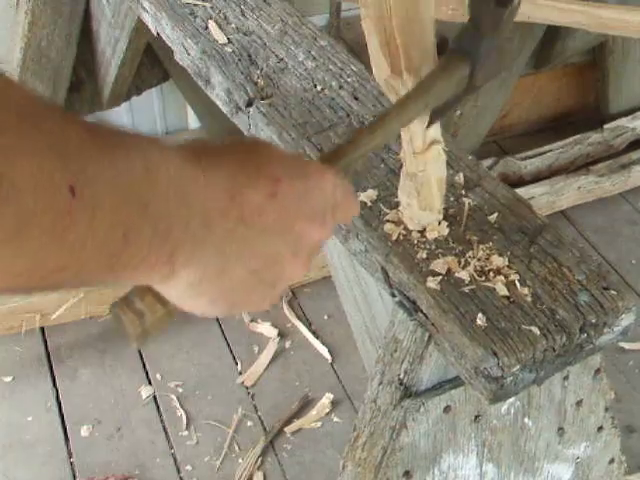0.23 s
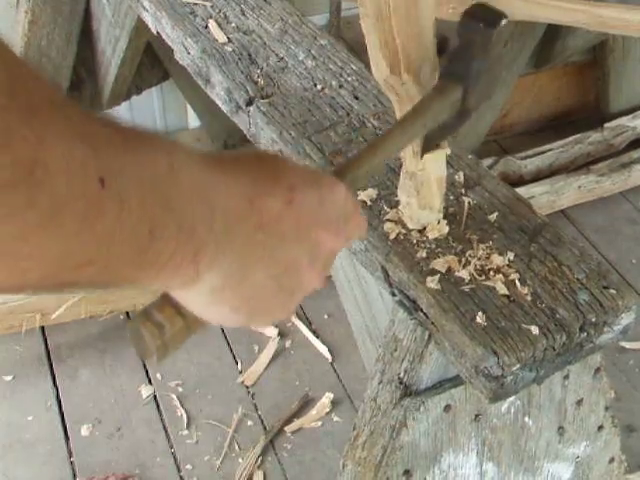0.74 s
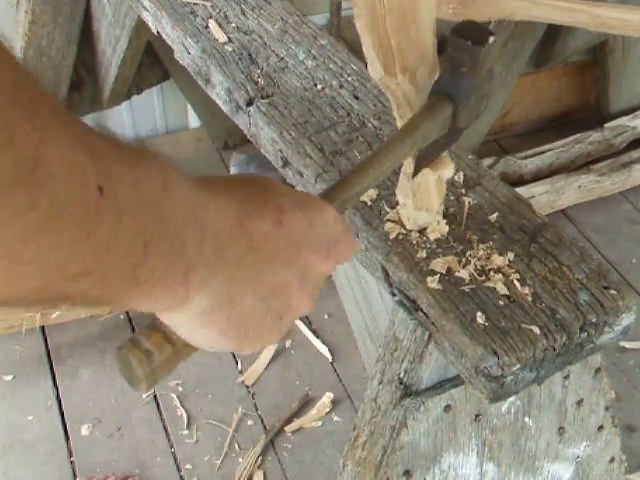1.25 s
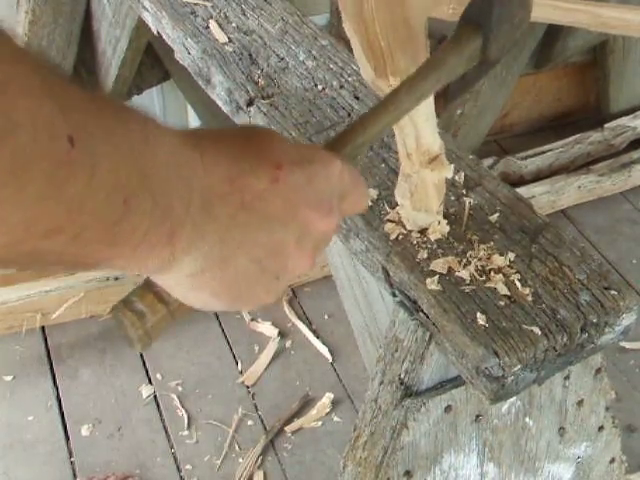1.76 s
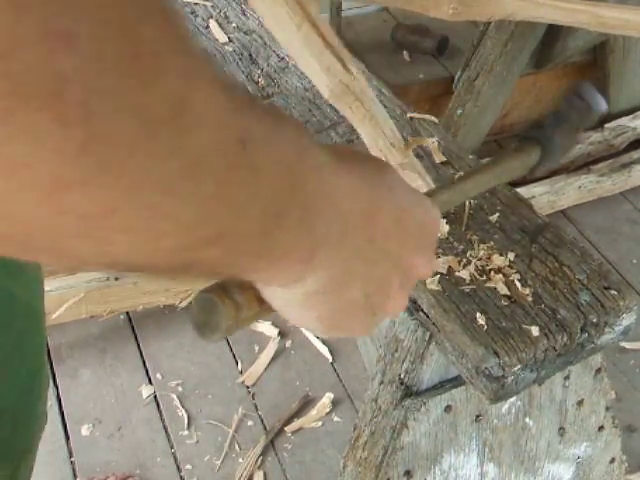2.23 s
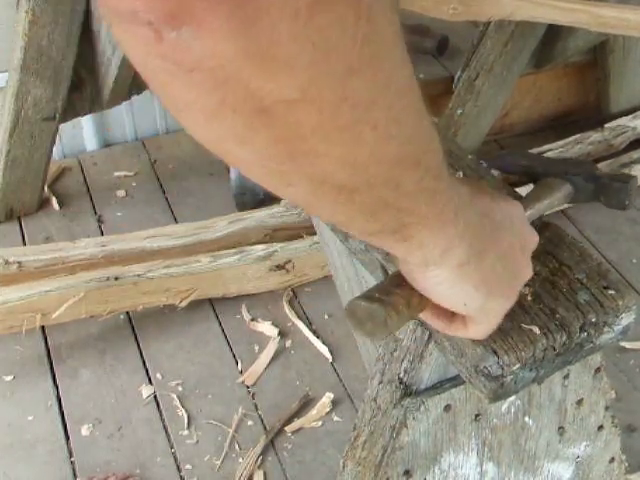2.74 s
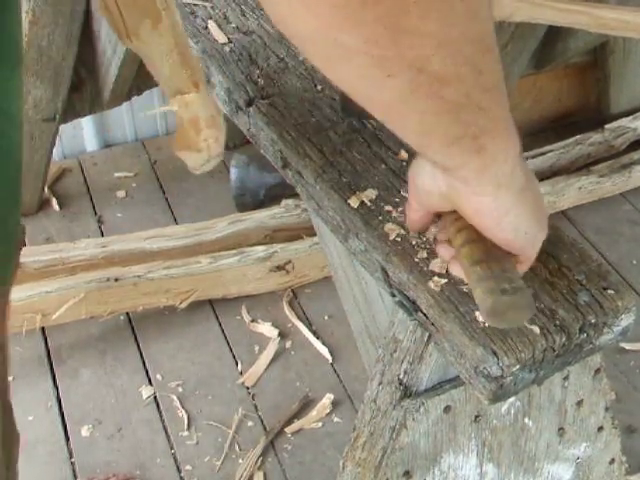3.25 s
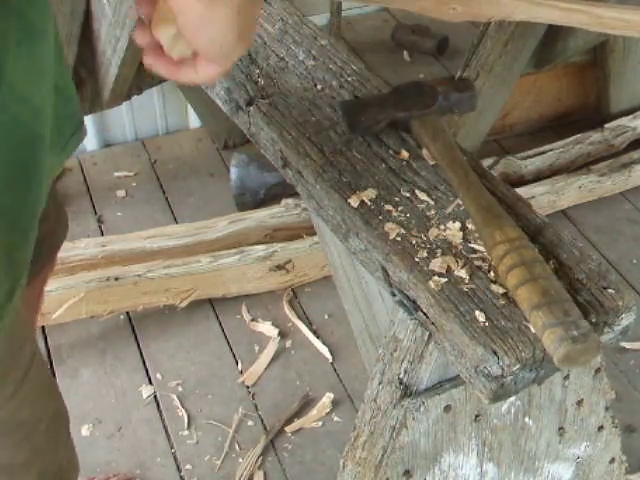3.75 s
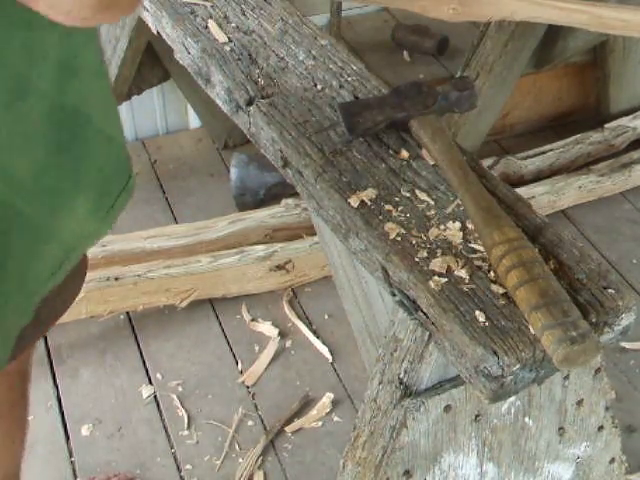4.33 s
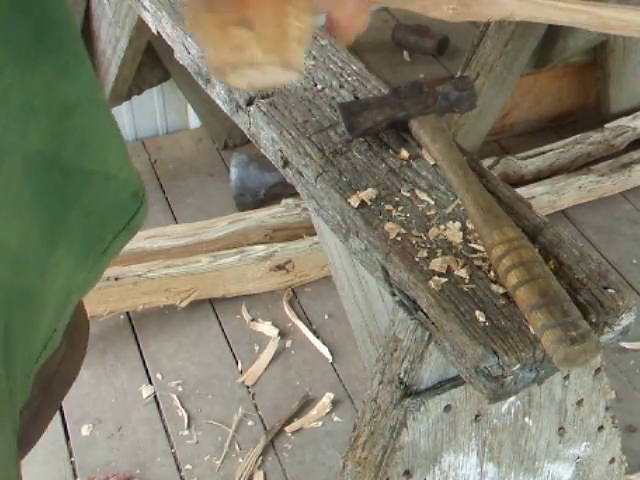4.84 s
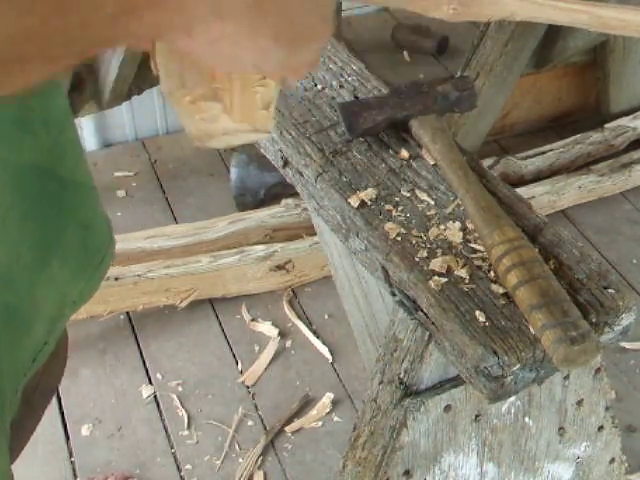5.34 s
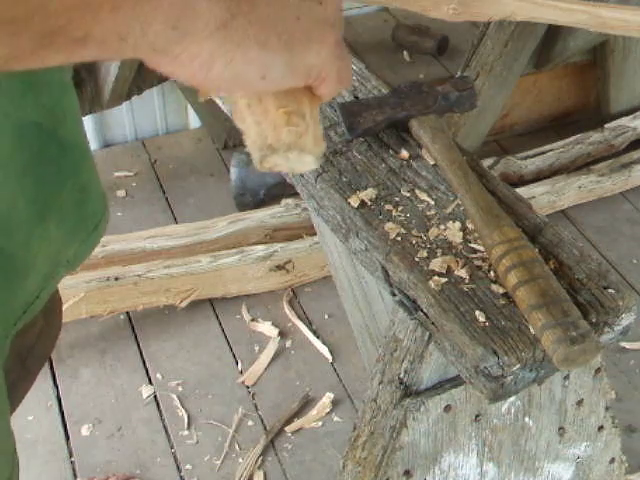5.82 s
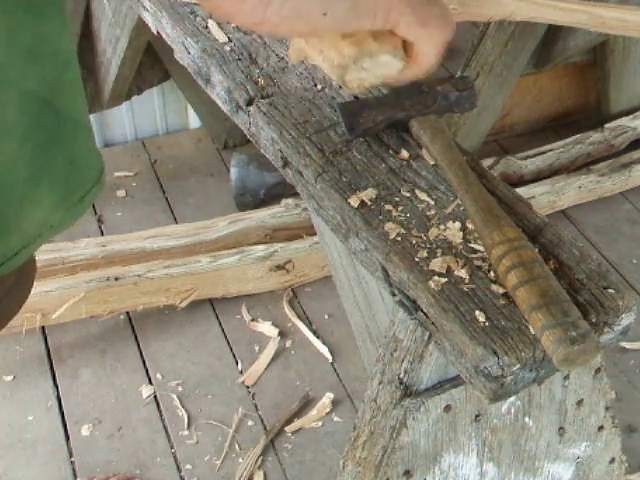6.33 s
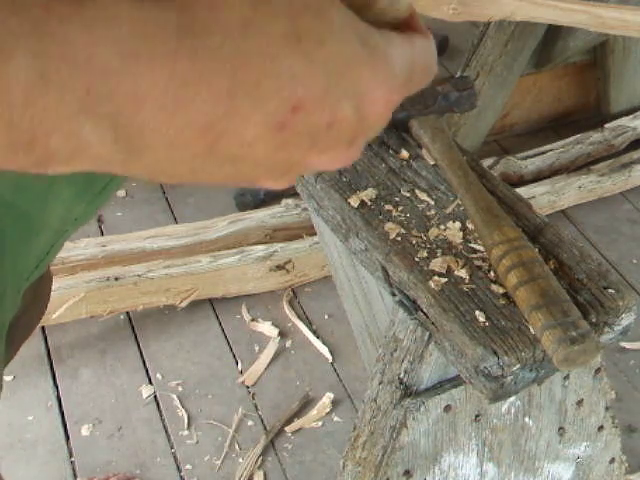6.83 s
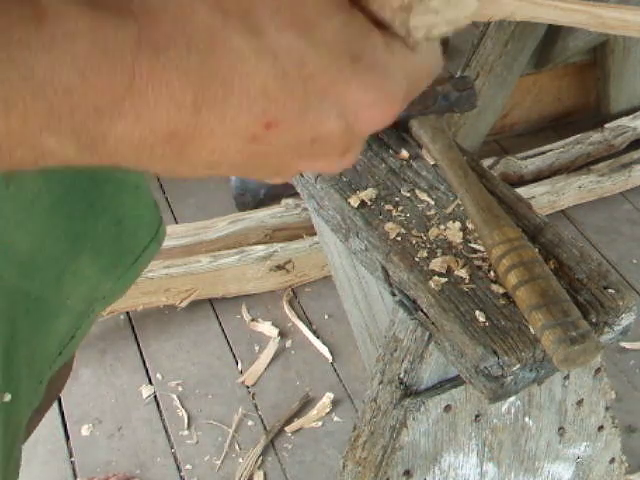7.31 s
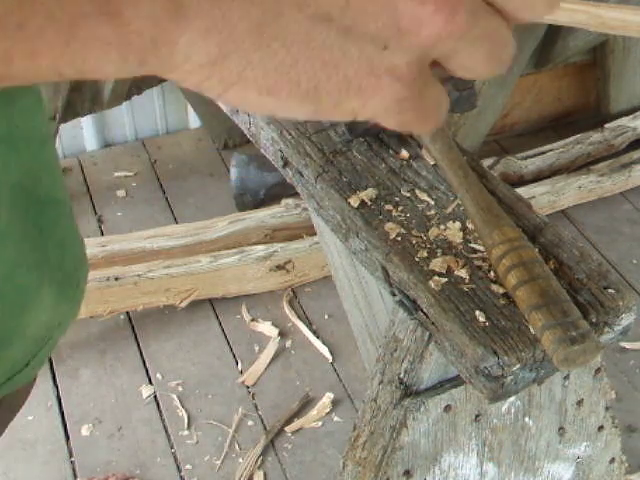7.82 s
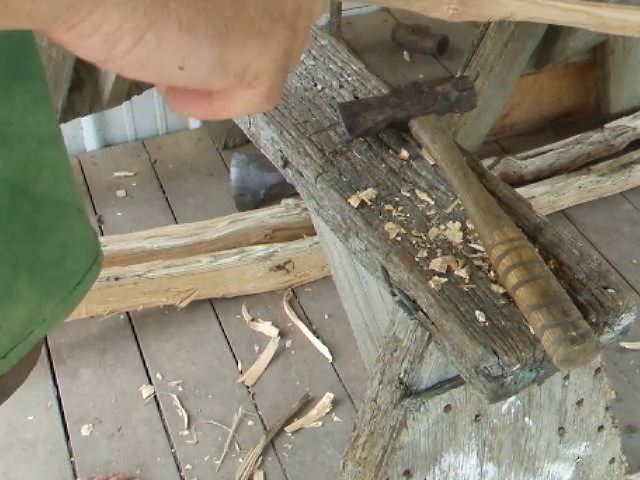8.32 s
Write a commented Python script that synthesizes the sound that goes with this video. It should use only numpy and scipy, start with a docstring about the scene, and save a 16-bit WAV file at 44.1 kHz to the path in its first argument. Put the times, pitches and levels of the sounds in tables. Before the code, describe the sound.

Fingers rub and pick at carved wood with small crackles, before it clatters loudly onto boards; birds sing softly outdoors.

```python
"""Carved wood on a porch

A carved piece of wood is turned, rubbed and picked at: skin slips on the grain, splinters and grit snap.
It is knocked down on the porch boards, which ring over booming joists and jar loose steel.
Two birds trill and whistle in the yard over faint outdoor air. A small camera samples the sound
coarsely, so the quiet parts flicker between two steps of its converter."""
import sys
import numpy as np
from scipy import signal
from scipy.fft import rfft, irfft, next_fast_len
from scipy.io import wavfile
from scipy.ndimage import uniform_filter1d

SR = 44100
rng = np.random.default_rng(int(sys.argv[2]) if len(sys.argv) > 2 else 0)


def generate_wav(sig):
    """Save sig (samples, or channels by samples) to the path in sys.argv[1] as 16-bit PCM at SR."""
    pcm = np.round(np.clip(np.atleast_2d(sig).T, -1, 1) * 32767).astype(np.int16)
    wavfile.write(sys.argv[1], SR, pcm)


N = 377937

# Spectra of outdoor air and skin friction. Each row: frequency in Hz, relative density in dB.
AIR_SPECTRUM = [(20, 13), (60, 4.5), (150, 2.5), (500, 1.5), (1500, -2.5), (3000, -4), (6000, -6),
                (8000, -6)]
HISS_SPECTRUM = [(900, -17), (2000, -15), (3500, -4), (5000, -0.5), (7300, 1), (8000, 0), (10000, -10)]
# Resonances of the handled wood. Each row: centre in Hz, width in Hz, relative gain in dB.
HOLLOW_PEAKS = [(640, 520, 0), (1050, 750, -2)]
PIECE_PEAKS = [(1800, 420, 0), (2660, 520, -3), (3700, 300, -9), (4700, 500, -2)]
RASP_PEAKS = [(2200, 2600, 0)]
THRUM_PEAKS = [(150, 170, -2), (360, 330, 0)]
# Finger picks. Each row: start, rise and fall in seconds, then hiss, low ring and high ring in dB.
FINGER_PICKS = [(0, 0.007, 0.037, -50, -61.5, -53.5), (.03, 0.029, 0.058, -55, -56, -59),
                (.26, 0.056, 0.052, -48.5, -50.5, -50.5), (.39, 0.025, .09, -54.5, -53.5, -52),
                (.51, 0.044, 0.042, -60.5, -63.5, -52.5), (.56, 0.042, 0.042, -49.5, -52.5, -53),
                (2.825, 0.032, .04, -50, -54, -57.5), (2.86, 0.064, 0.037, -50, -54.5, -56.5),
                (3.26, 0.03, 0.024, -48.5, -51.5, -62), (3.37, 0.019, 0.048, -61, -58, -64),
                (3.425, 0.026, 0.021, -55, -55.5, -59.5), (7.495, 0.019, 0.052, -54.5, -59.5, -58)]
# Broad rubs. Each row: start, rise and fall in seconds, then hiss, hollow and thrum in dB.
HAND_RUBS = [(1.25, 0.048, .03, -51, -71, -62.5), (3.91, 0.054, 0.036, -52, -63, -57.5),
             (3.975, 0.081, 0.065, -38, -49.5, -60), (4.05, 0.28, 0.12, -41.5, -48.5, -50.5),
             (4.36, .11, .12, -43.5, -55.5, -61), (4.54, 0.091, 0.032, -41, -45, -52),
             (4.66, 0.076, .045, -43, -44.5, -47.5), (4.78, .048, 0.034, -50, -37.5, -57),
             (4.86, 0.024, 0.066, -50.5, -43.5, -58), (6.03, 0.13, 0.091, -50, -68, -62),
             (6.57, 0.061, 0.074, -44.5, -59, -61.5), (6.63, 0.12, .09, -39.5, -48, -53.5),
             (7.16, 0.053, .08, -49, -51.5, -56.5), (8.2, 0.054, 0.069, -49.5, -57.5, -47),
             (8.29, .1, 0.081, -41, -50.5, -55.5)]
# Porch echo. Each row: frequency in Hz, T60 in seconds.
PORCH_DECAY = [(70, 0.67), (250, 0.26), (700, 0.18), (2000, 0.16), (7000, .12)]
# First bird. Each row: start in seconds, level in dB, length in seconds.
TRILL_NOTES = [(0.034, -57, 0.057), (0.101, -53.5, 0.073), (.178, -53, 0.061), (0.256, -52.5, 0.058),
               (0.332, -53.5, 0.051), (0.393, -54.5, 0.034), (0.463, -55, 0.049), (0.537, -53.5, 0.037),
               (0.62, -55.5, .04), (.66, -55, .06), (0.726, -54, 0.05), (0.789, -54, .035),
               (0.841, -60.5, .035), (0.896, -61, .03)]
# Knocks and bounces. Each row: start in seconds, board peak in dB, blow centre in Hz,
# chatter T60 in seconds, boom peak in dB, crack level in dB.
BOARD_KNOCKS = [(.474, -37.5, 1007, 0.018, -70, -76), (4.821, -30, 894, 0.058, -61, -57),
                (4.883, -31.5, 760, 0.042, -59, -50), (5.241, -44, 251, 0.03, -40, -47.5),
                (6.791, -39, 294, 0.05, -54, -44), (7.125, -36, 308, 0.057, -36, -72),
                (7.3909, -12, 1500, 0.019, -31.5, -31), (7.3915, -13.5, 2660, 0.0055, -48.5, -33),
                (7.401, -19, 560, .13, -36, -50), (7.501, -40.5, 777, 0.076, -44.5, -40),
                (7.84, -13.5, 944, 0.051, -25, -30.5), (7.843, -9, 225, 0.027, -26.5, -27.5),
                (7.862, -15, 487, 0.095, -28, -27), (7.897, -25.5, 250, 0.038, -57, -47),
                (8.1557, -20.5, 2700, 0.044, -30.5, -18.5), (8.164, -17, 207, 0.037, -25.5, -60),
                (8.172, -19.5, 540, 0.08, -24.5, -31), (8.21, -31, 418, 0.12, -33, -56)]
# Modes of boards, joists and loose steel. Each row: frequency in Hz, relative level in dB, T60 in seconds.
BOARD_MODES = [(150, -7, .04), (200, 0, .04), (245, 0, .045), (310, -2, .045), (410, 0, .05),
               (575, 1, .055), (750, -3, .035), (930, 0, .035), (1170, 1, .025), (1320, 4, .025),
               (1500, -1, .022), (2000, -5, .02), (2600, 2, .02)]
JOIST_MODES = [(50, -1, .3), (69, 1, .4), (88, -3, .25), (108, -2, .4)]
LOW_STEEL_MODES = [(4020, -17, .04), (4580, 3.5, 0.034)]
HIGH_STEEL_MODES = [(5280, 7, 0.014), (7550, 1, 0.021), (7290, 5, 0.06)]
# Splinters and grit. Each row: start in seconds, snap peak in dB, centre in Hz, ring peak in dB.
SPLINTER_SNAPS = [(.622, -36, 7180, -74), (.8075, -17.5, 7370, -53), (1.19, -29.5, 7550, -70),
                  (1.6509, -17.5, 5200, -22), (1.7067, -34.5, 4360, -54), (2.0667, -39, 4570, -32.5),
                  (2.354, -21, 6160, -24), (2.3802, -26.5, 4300, -42), (2.453, -23.5, 7500, -33.5),
                  (2.8537, -33, 7540, -57), (3.4429, -34, 3580, -51), (4.423, -24, 7140, -48),
                  (4.5013, -22.5, 7160, -45), (4.512, -18, 7390, -57.5), (4.527, -20.5, 7700, -60.5),
                  (4.564, -19, 5530, -32.5), (4.6088, -13.5, 5540, -37), (4.6294, -24.5, 3640, -51),
                  (4.667, -18.5, 6400, -53), (4.6848, -20.5, 7500, -43), (4.712, -15.5, 7660, -52),
                  (4.7294, -19.5, 3100, -42), (4.7344, -16, 5060, -40), (4.788, -8.5, 6400, -55),
                  (4.817, -11.5, 6150, -20.5), (4.8572, -20.5, 7000, -54), (4.8814, -23, 5330, -53),
                  (5.0534, -25.5, 6200, -50), (5.243, -27, 3550, -51), (5.2853, -38, 3250, -55),
                  (7.1314, -29.5, 4670, -58), (7.199, -30, 2820, -39), (7.7616, -33, 3900, -61),
                  (8.5091, -32, 6800, -69)]
# Second bird. Each row: start and length in seconds, first, middle and last pitch in Hz, level in dB.
SONG_NOTES = [(2.529, 0.12, 6860, 7485, 7310, -66.5), (2.681, 0.065, 6090, 6010, 6020, -66),
              (3.04, 0.093, 4475, 4476, 4390, -66), (5.3, 0.13, 2950, 2490, 2450, -67),
              (5.468, 0.074, 3730, 3360, 3440, -65), (5.62, 0.052, 2090, 2180, 2130, -64.5),
              (5.651, 0.059, 3990, 4200, 4280, -68), (5.702, 0.041, 2036, 2247, 2360, -65),
              (5.792, 0.11, 2542, 2270, 2303, -57), (6.089, 0.045, 1780, 1794, 1770, -61.5),
              (6.124, 0.048, 3363, 2990, 2760, -55), (6.171, 0.12, 3210, 2300, 1983, -59),
              (6.298, 0.063, 2387, 2850, 3306, -58.5), (6.352, .085, 3305, 3423, 3440, -58.5),
              (6.436, 0.088, 3900, 4170, 4250, -68), (6.627, 0.055, 2430, 2306, 2410, -57),
              (6.72, 0.063, 2286, 2540, 2440, -61), (6.83, 0.072, 2450, 2400, 2174, -60.5),
              (7.09, .06, 3414, 3495, 3570, -59), (7.144, 0.089, 3500, 2993, 2810, -61.5)]
# Jarred steel. Each row: start in seconds, low and high steel peaks in dB, rattle T60 in seconds.
STEEL_RATTLES = [(7.3924, -72, -40, 0.032), (7.499, -60, -44, .2), (7.862, -25, -33, .06),
                 (8.1546, -48, -21, 0.029)]

AIR_DB, PORCH_DB = -53.5, -8.5
STROKE_FADE_DB, PICK_HOLLOW_DB, RUB_RASP_DB = -20, -11.5, -7.5
TRILL_HZ, TRILL_RISE_HZ_PER_S, SLIDE_SHARE, SLIDE_S = 3624, 250, .1, .011
YARD_T60_S, TRILL_ECHO_DB, SONG_ECHO_DB = .2, -3.5, 3
SNAP_TAIL_T60_S, SNAP_TAIL_DB, SNAP_WIDTH_SHARE = .044, -17, .69
MIC_LOW_HZ, CAMERA_RATE_HZ, BAND_LIMIT_HZ = 45.3, 16000, 9050
STEP, OFFSET_STEPS = np.sqrt(.5) / 128, -.42


def amp(db):
    """dB to gain."""
    return 10 ** (np.asarray(db) / 20)


def unit_rms(x):
    """Scales to rms 1."""
    return x / np.sqrt(np.mean(x ** 2) + 1e-20)


def peaked(db, x):
    """Scales to a peak level."""
    return amp(db) * x / abs(x).max()


def lookup(table, hz):
    """Interpolates on a log-frequency axis."""
    table_hz, values = np.transpose(table)
    return np.interp(np.log(hz + 1), np.log(table_hz + 1), values)


def add(mix, start_s, sound):
    """Mixes a sound in."""
    part = mix[round(start_s * SR):][:len(sound)]
    part += sound[:len(part)]


def wander(n, window_samples):
    """Smoothed noise, rms 1."""
    return unit_rms(uniform_filter1d(rng.standard_normal(n), window_samples))


def coloured(x, spectrum):
    """Shapes by a spectrum table, rms 1."""
    size = next_fast_len(len(x))
    gain = amp(lookup(spectrum, np.fft.rfftfreq(size, 1 / SR)))
    return unit_rms(irfft(rfft(x, size) * gain, size)[:len(x)])


def resonate(x, hz, width_hz):
    """Two-pole resonance, gain 1."""
    return signal.lfilter(*signal.iirpeak(hz, hz / width_hz, SR), x)


def body(x, peaks):
    """Parallel broad resonances, alternating in sign."""
    return sum((-1) ** k * amp(db) * resonate(x, hz, width) for k, (hz, width, db) in enumerate(peaks))


def ring(modes, scatter):
    """Decaying modes, each a cluster of three scattered by the place of the blow."""
    t = np.arange(SR // 2) / SR
    detunes = 1 + scatter * rng.standard_normal((len(modes), 3, 1))
    return sum(amp(db - 60 * t / t60_s) * np.sin(2 * np.pi * hz * detune * t).sum(0)
               for (hz, db, t60_s), detune in zip(modes, detunes))


def burst(t, grit, t60_s):
    """One hard contact, then decaying grit."""
    return (t == 0) + grit * amp(-60 * t / t60_s) * rng.standard_normal(len(t))


def air():
    """Distant outdoor wash, swelling slowly."""
    swell_db = .8 * unit_rms(uniform_filter1d(wander(N, 6000), 6000))
    return amp(AIR_DB + swell_db) * coloured(rng.standard_normal(N), AIR_SPECTRUM)


def strokes():
    """Skin drags over grain: dense uneven slips excite hiss and the resonances under the hand."""
    slips = rng.standard_normal(N) * amp(2.5 * np.minimum(rng.exponential(1, N), 5))
    slips *= amp(1.9 * wander(N, 250))  # grip flutter
    hiss = coloured(slips, HISS_SPECTRUM)
    hollow, low_ring, high_ring, rasp, thrum = (
        unit_rms(body(body(slips, peaks), peaks))
        for peaks in (HOLLOW_PEAKS, PIECE_PEAKS[:1], PIECE_PEAKS[1:2], RASP_PEAKS, THRUM_PEAKS))
    pick_layers = hiss + amp(PICK_HOLLOW_DB) * hollow, low_ring, high_ring
    rub_layers = hiss + amp(RUB_RASP_DB) * rasp, hollow, thrum
    out = np.zeros(N)
    for rows, layers in ((FINGER_PICKS, pick_layers), (HAND_RUBS, rub_layers)):
        for start_s, rise_s, fall_s, *levels_db in rows:
            slack = np.r_[np.linspace(1, 0, int(rise_s * SR)), np.linspace(0, 1, int(fall_s * SR))]
            pressure = amp(STROKE_FADE_DB * slack ** 2) * signal.windows.tukey(len(slack), .1)
            span = slice(round(start_s * SR), round(start_s * SR) + len(slack))
            friction = sum(amp(db) * layer[span] for db, layer in zip(levels_db, layers))
            add(out, start_s, pressure * friction)
    return out


def porch_echo(x):
    """Roof, wall and drumming boards: sparse random-sign taps, each band with its own decay."""
    taps = np.zeros(SR // 2)
    slots = np.arange(100, SR // 2 - 20, 20)
    taps[slots + rng.integers(0, 20, len(slots))] = rng.choice([-1., 1.], len(slots))
    hz, t, bands = signal.stft(taps, SR, nperseg=256)
    decay = amp(-60 * t / lookup(PORCH_DECAY, hz)[:, None])
    tail = signal.istft(bands * decay, SR, nperseg=256)[1]
    return signal.fftconvolve(x, tail / np.linalg.norm(tail))[:N]


def whistle(hz, db):
    """Near-sine; level and pitch tremble on the way through the leaves."""
    tremble_db = 3 * wander(SR // 4, 200)[:len(hz)]
    detune = 1 + .008 * wander(SR // 4, 200)[:len(hz)]
    cycles = np.cumsum(hz * detune) / SR
    envelope = amp(db + tremble_db) * signal.windows.tukey(len(hz), .4)
    return envelope * np.sqrt(2) * np.sin(2 * np.pi * cycles)


def bird_trill():
    """Each note slides up to its pitch; the trill rises slowly."""
    out = np.zeros(N)
    for start_s, db, length_s in TRILL_NOTES:
        t = np.arange(0, length_s, 1 / SR)
        target_hz = TRILL_HZ + TRILL_RISE_HZ_PER_S * start_s
        slide = 1 - SLIDE_SHARE * np.exp(-t / SLIDE_S)
        add(out, start_s, whistle(target_hz * slide, db))
    return out


def yard_echo(x):
    """Dense decaying echoes smear the notes."""
    t = np.arange(8000) / SR
    tail = amp(-60 * t / YARD_T60_S) * rng.standard_normal(len(t))
    return signal.fftconvolve(x, tail / np.linalg.norm(tail))[:N]


def knocks():
    """The blow chatters into the boards; joists boom, the contact cracks."""
    out, t = np.zeros(N), np.arange(6000) / SR
    for start_s, board_db, hz, chatter_t60_s, boom_db, crack_db in BOARD_KNOCKS:
        chatter = burst(t, .12, chatter_t60_s)
        blow = resonate(resonate(chatter, hz, 1.1 * hz), hz, 1.1 * hz)
        boards = signal.fftconvolve(blow, ring(BOARD_MODES, scatter=.07))
        add(out, start_s, peaked(board_db, boards))
        add(out, start_s, peaked(boom_db, ring(JOIST_MODES, scatter=.09)))
        crack = signal.lfilter(*signal.butter(2, 1800, "high", fs=SR), rng.standard_normal(len(t)))
        add(out, start_s, amp(crack_db - 60 * t / .05) * crack)
    return out


def snaps():
    """Splinters and grit snap with a short gritty tail and ring the piece."""
    out, t = np.zeros(N), np.arange(3000) / SR
    for start_s, snap_db, hz, ring_db in SPLINTER_SNAPS:
        snap = burst(t, grit=.61, t60_s=.0038) + burst(t, amp(SNAP_TAIL_DB), SNAP_TAIL_T60_S)
        add(out, start_s, peaked(snap_db, resonate(snap, hz, SNAP_WIDTH_SHARE * hz)))
        add(out, start_s, peaked(ring_db, body(snap, PIECE_PEAKS)))
    return out


def bird_song():
    """A farther bird whistles phrases; each note bends through three pitches."""
    out = np.zeros(N)
    for start_s, length_s, first_hz, middle_hz, last_hz, db in SONG_NOTES:
        position = np.linspace(-1, 1, int(length_s * SR))
        glide_hz = position * (last_hz - first_hz) / 2
        bend_hz = position ** 2 * ((first_hz + last_hz) / 2 - middle_hz)
        add(out, start_s, whistle(middle_hz + glide_hz + bend_hz, db))
    return out


def rattles():
    """Loose steel chatters and rings, jarred by the hardest knocks."""
    out, t = np.zeros(N), np.arange(6000) / SR
    for start_s, low_db, high_db, t60_s in STEEL_RATTLES:
        for db, modes in ((low_db, LOW_STEEL_MODES), (high_db, HIGH_STEEL_MODES)):
            steel = signal.fftconvolve(burst(t, .3, t60_s), ring(modes, scatter=.02))
            add(out, start_s, peaked(db, steel))
    return out


def scene():
    """Mono mix: near sounds with porch echo, birds with yard echo, air."""
    near = strokes() + snaps() + knocks() + rattles()
    porch = near + amp(PORCH_DB) * porch_echo(near)
    trill, song = bird_trill(), bird_song()
    yard = trill + song + yard_echo(amp(TRILL_ECHO_DB) * trill + amp(SONG_ECHO_DB) * song)
    return (porch + yard + air())[None]


def record(dry):
    """Microphone bass cut, low-rate 8-bit converter with offset, playback filter, band limit."""
    mic = signal.lfilter(*signal.butter(2, MIC_LOW_HZ, "high", fs=SR), dry)
    anti_alias = signal.firwin(160 * 60 + 1, 8600, window=("kaiser", 6), fs=160 * SR)
    sampled = signal.resample_poly(mic, 160, 441, axis=1, window=anti_alias)
    stepped = STEP * np.round(sampled / STEP + OFFSET_STEPS)
    # gentle slope: a faint mirror of the top notes passes above half the rate
    playback = signal.firwin(160 * 88 + 1, CAMERA_RATE_HZ / 2, window=("kaiser", 9), fs=160 * SR)
    played = signal.resample_poly(stepped, 441, 160, axis=1, window=playback)[:, :N]
    played = np.pad(played, ((0, 0), (0, N - played.shape[1])), "edge")
    band_limit = signal.firwin(511, BAND_LIMIT_HZ, window=("kaiser", 9), fs=SR)
    return signal.oaconvolve(played, band_limit[None], "same")


dry = scene()
out = record(dry)
generate_wav(out)
```